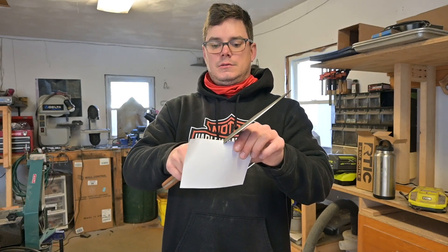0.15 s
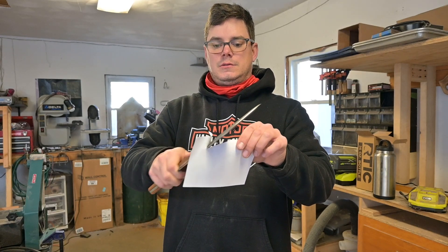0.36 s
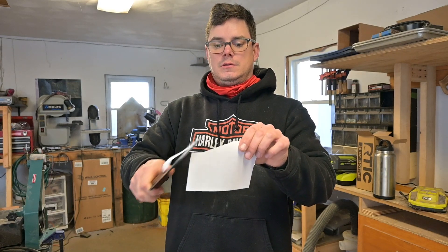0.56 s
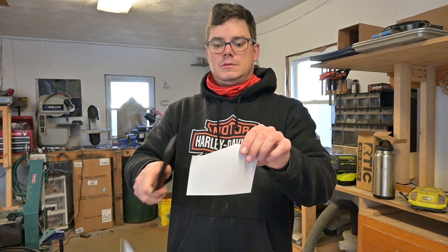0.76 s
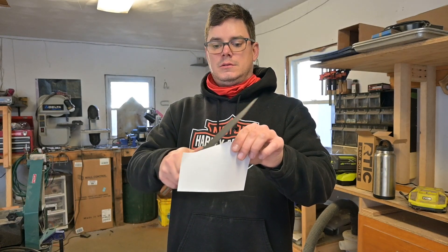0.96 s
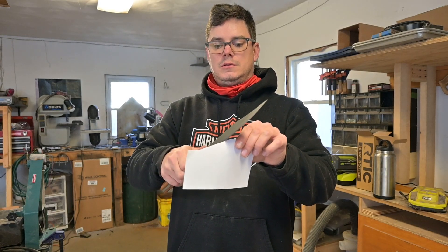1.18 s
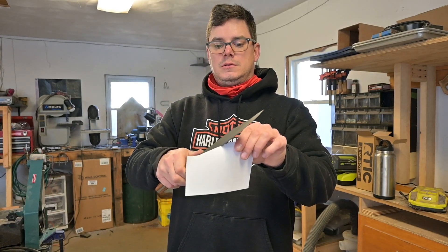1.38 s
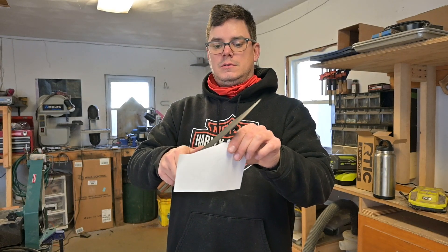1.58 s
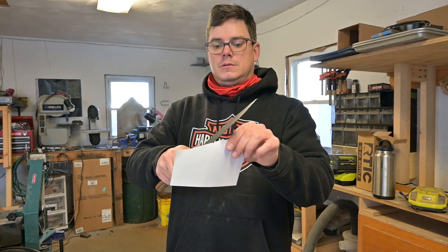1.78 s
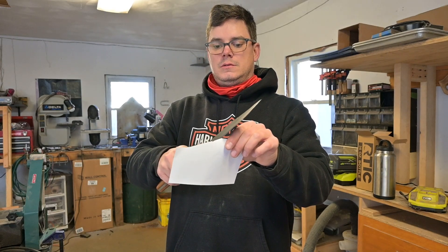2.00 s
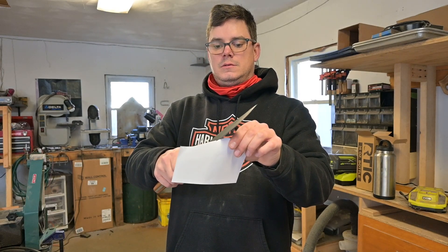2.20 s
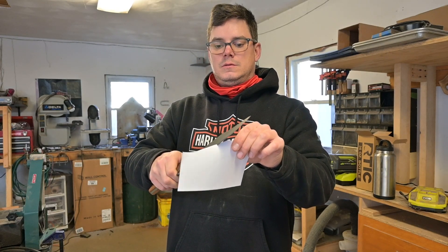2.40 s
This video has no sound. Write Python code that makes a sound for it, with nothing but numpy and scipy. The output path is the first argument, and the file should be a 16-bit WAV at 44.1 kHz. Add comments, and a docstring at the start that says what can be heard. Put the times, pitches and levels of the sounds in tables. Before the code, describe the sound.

A sharp knife cuts a hand-held sheet of paper. A soft hiss swells and brightens from 0 to 0.45 s, rips sharply out at 0.5 s, and the strip flicks free with a papery pop. Quiet follows until 1.1 s, then quick scratchy nibbles with ticks to 1.5 s, faint sliding, slower rasps at 2.05-2.3 s, and crackly kinks at 2.35-2.4 s. Short room reflections, low steady air noise, nearly mono.

```python
"""A sharp knife slices a hand-held sheet of paper in a small workshop. Snapping fibres (random pulses) hiss
and brighten as the blade speeds up, with sliding sheet resonances (swept band-passes). At about 0.5 s the blade
rips out through the edge (coloured pulses, rings) and the strip flicks free. From 0.7 s the knife nibbles in short
scratchy strokes (gated pulses) while the paper ticks (noise bursts), buckles (band noise) and kinks (damped sines);
from 1.6 s the resting blade slides faintly. Near echoes, a short room answer and steady air noise lie throughout."""
import sys
import numpy as np
from scipy import signal
from scipy.fft import rfft, irfft, next_fast_len
from scipy.io import wavfile
from scipy.ndimage import uniform_filter1d, map_coordinates

SR = 44100
rng = np.random.default_rng(int(sys.argv[2]) if len(sys.argv) > 2 else 0)


def transcribe(signal):
    """Save signal, clipped to [-1, 1], as a 16-bit WAV file at the path in sys.argv[1]."""
    frames = np.atleast_2d(signal).T
    limited = np.clip(frames, -1, 1)
    pcm = np.round(limited * 32767).astype(np.int16)
    wavfile.write(sys.argv[1], SR, pcm)


N = 108045
TIME_S = np.arange(N) / SR
FIBRES_PER_S, SLICE_SPREAD_DB, STROKE_SPREAD_DB = 9000, 3, 6


def amp(db):
    """Decibels to gain."""
    return 10 ** (np.asarray(db) / 20)


def unit(x):
    """Scale to rms 1."""
    return x / np.sqrt(np.mean(x ** 2) + 1e-20)


def along(points, hz):
    """(f/Hz, value) points interpolated on a log frequency axis."""
    f, v = np.transpose(points)
    return np.interp(np.log(hz + 1), np.log(f + 1), v)


def level(rows):
    """Gain per sample from rows of (t/s, .., level/dB); -120 dB outside, but a start before 0.05 s is held."""
    rows = np.array(rows)
    start_s, start_db = rows[0, 0], rows[0, -1]
    before_db = start_db if start_s < .05 else -120
    return amp(np.interp(TIME_S, rows[:, 0], rows[:, -1], left=before_db, right=-120))


def filtered(x, response):
    """Multiply the spectrum of x by response(f/Hz)."""
    size = next_fast_len(N + SR // 2)
    hz = np.fft.rfftfreq(size, 1 / SR)
    return irfft(rfft(x, size) * response(hz), size)[..., :N]


def impulse(colour, size=1024):
    """Minimum-phase impulse response of a colour, by folding the cepstrum."""
    hz = np.fft.rfftfreq(size, 1 / SR)
    cepstrum = irfft(np.log(amp(along(colour, hz))))
    cepstrum[1:size // 2] *= 2
    cepstrum[size // 2 + 1:] = 0
    return irfft(np.exp(rfft(cepstrum)))


def coloured(x, colour):
    """x through a causal colour."""
    return signal.fftconvolve(x, impulse(colour))[:N]


def fibres(spread_db, clump_db):
    """Dense tiny snaps of random size and sign that come in clumps, rms 1."""
    knots = TIME_S * 300  # 300 random clump levels per second
    clumps = map_coordinates(rng.standard_normal(int(knots[-1]) + 4), [knots])
    spread = np.clip(rng.standard_normal(N), -2, 2)
    sizes = amp(spread_db * spread + clump_db * clumps)
    snapped = rng.random(N) < FIBRES_PER_S / SR
    return unit(snapped * sizes * rng.choice([-1, 1], N))


def gritty(fine):
    """Fine fibres mixed with the sparser snaps of coarse ones; about rms 1."""
    coarse_per_s, coarse_share = 400, .26  # share of the power
    coarse = (rng.random(N) < coarse_per_s / SR) * rng.uniform(-1, 1, N)
    return np.sqrt(1 - coarse_share) * fine + np.sqrt(coarse_share) * unit(coarse)


def flexing(x):
    """The bending sheet favours ever new narrow bands for a few tens of milliseconds; rms 1."""
    flex_db = 2.6  # standard deviation of the band gains
    z = signal.stft(x, nperseg=512)[2]
    field = uniform_filter1d(rng.standard_normal(z.shape), size=3, axis=0)  # smooth in frequency
    field = uniform_filter1d(field, size=8, axis=1)  # smooth in time
    return unit(signal.istft(z * amp(flex_db * unit(field)), nperseg=512)[1][:N])


def resonate(x, hz, width_hz):
    """Slope of x through a steep resonance whose pitch may move, rms 1."""
    turn = np.exp(2j * np.pi * np.cumsum(hz * np.ones(N)) / SR)
    b, a = signal.butter(3, width_hz / SR)
    at_zero_hz = signal.lfilter(b, a, np.gradient(x) / turn)
    return unit((at_zero_hz * turn).real)


def glide(rows, width_hz):
    """Sliding resonance driven by a stream of fibres without clumps; rows of (t/s, f/Hz, level/dB)."""
    s, hz, _ = np.transpose(rows)
    stream = fibres(2, clump_db=0)
    return level(rows) * resonate(stream, np.interp(TIME_S, s, hz), width_hz)


def long_slice():
    """Snapping fibres: a swelling hiss that brightens with blade speed, plus four sliding sheet resonances."""
    # hiss: t/s, level/dB
    hiss_level = [(0, -45), (.11, -41.5), (.17, -34), (.21, -36.5), (.24, -33), (.29, -30), (.35, -27),
                  (.385, -30), (.42, -28.5), (.445, -32), (.47, -44), (.56, -63)]
    # hiss colour of the slow and the fast blade: f/Hz, gain/dB
    slow_colour = [(40, -54), (130, -30), (400, -23), (900, 1), (2700, 3.5), (3050, 0), (3500, 5),
                   (4100, 3.5), (4650, 4.5), (5400, -2), (7500, -2), (8500, -1), (9400, -3.5), (10000, -18),
                   (11500, -16.5), (12500, -0.5), (14000, -6.5), (16000, -11)]
    fast_colour = [(40, -49), (130, -32), (400, -16.5), (900, -14.5), (2000, 0), (3500, -1.5), (6000, -1),
                   (9200, 0), (10300, -10.5), (11400, -3.5), (12800, -7), (14300, -7), (16000, -11)]
    # sliding sheet resonances: t/s, f/Hz, level/dB
    low_glide = [(0, 1950, -53.5), (.05, 1900, -47.5), (.11, 1800, -43), (.15, 1750, -38),
                 (.18, 1500, -35.5), (.22, 1180, -40.5), (.25, 1060, -55)]
    mid_glide = [(.1, 13200, -61), (.2, 12700, -41.5), (.28, 12700, -32.5), (.33, 12600, -38),
                 (.375, 12500, -37), (.44, 12700, -47.5)]
    high_glide = [(.305, 16000, -48), (.333, 15200, -39), (.36, 13100, -32), (.385, 12100, -39),
                  (.398, 9400, -41), (.425, 9200, -36.5), (.44, 8400, -29), (.449, 7500, -51),
                  (.458, 6000, -38), (.48, 5700, -28.5)]
    # strongest ring, swelling as the cut nears the edge: t/s, f/Hz, level/dB
    ring_glide = [(.39, 2580, -48), (.465, 2420, -33), (.485, 2430, -28), (.515, 2380, -32),
                  (.535, 2330, -51)]

    speed = np.interp(TIME_S, [0.19, 0.313], [0, 1])  # 0 slow, 1 fast
    slow = flexing(coloured(gritty(fibres(SLICE_SPREAD_DB, clump_db=-0.2)), slow_colour))
    fast = flexing(coloured(fibres(SLICE_SPREAD_DB, clump_db=1.0), fast_colour))
    hiss = level(hiss_level) * (np.sqrt(1 - speed) * slow + np.sqrt(speed) * fast)
    low = glide(low_glide, width_hz=990)
    mid = glide(mid_glide, width_hz=1700)
    high = glide(high_glide, width_hz=1300)
    ring = glide(ring_glide, width_hz=470)
    return hiss + low + mid + high + ring


def rip():
    """The fast end of the cut sets the sheet ringing, then the cut strip flicks free as a sliding resonance."""
    # tear: t/s, level/dB
    tear_level = [(.41, -44.5), (.455, -24.5), (.48, -25), (.5, -21), (.512, -21), (.533, -19.5),
                  (.537, -28), (.541, -25), (.55, -36)]
    # tear colour: f/Hz, gain/dB
    tear_colour = [(50, -47), (150, -22.5), (280, -10), (900, -3.5), (1700, -3), (2800, 0.5), (5500, 3),
                   (8800, -0.5), (10500, -13), (13000, -4.5), (14500, -11.5), (16000, -20)]
    # sheet rings: f/Hz, width/Hz, level re tear/dB
    sheet_rings = [(4000, 360, -13), (5700, 320, -14)]
    # strip flicking free: t/s, f/Hz, level/dB
    flick_glide = [(.546, 2070, -35.5), (.552, 2500, -23), (.556, 2830, -25.5), (.562, 2880, -42)]

    tear = unit(coloured(fibres(SLICE_SPREAD_DB, clump_db=0.2), tear_colour))
    rings = np.zeros(N)
    for hz, width_hz, db in sheet_rings:
        rings += amp(db) * resonate(fibres(SLICE_SPREAD_DB, clump_db=-2.5), hz, width_hz)
    return level(tear_level) * (tear + rings) + glide(flick_glide, width_hz=1700)


def strokes():
    """Slow scratchy cuts: each rises, holds and stops; the sheet rasps and the fine edge adds fizz."""
    # strokes and brushes: start/s, end/s, scratch level/dB, rise/s, fizz level/dB
    cuts = [(.679, 0.695, -69, .004, -51), (1.127, 1.173, -49, 0.0147, -66),
            (1.174, 1.227, -41, 0.024, -54), (1.233, 1.292, -48, 0.012, -55.5),
            (1.276, 1.328, -41.5, 0.037, -44), (1.343, 1.379, -45.5, 0.012, -52),
            (1.398, 1.436, -45, 0.013, -43), (1.439, 1.494, -43.5, 0.024, -50.5),
            (1.55, 1.569, -67, .005, -54.5), (1.622, 1.661, -59, 0.025, -56),
            (1.699, 1.704, -49.5, 0.0018, -73), (1.721, 1.781, -62, .01, -75),
            (2.02, 2.103, -68, 0.021, -64.5), (2.066, 2.206, -41.5, 0.095, -56),
            (2.204, 2.297, -41, 0.037, -50), (2.339, 2.351, -39.5, 0.0027, -57),
            (2.4, 2.421, -49.5, 0.0045, -67)]
    # scratch and fizz colours: f/Hz, gain/dB
    scratch_colour = [(40, -34), (120, -19.5), (350, -10), (900, 3), (2200, 5), (3000, -3), (6000, -2),
                      (9200, 0.5), (10100, -15), (11500, -15), (13300, -10), (16000, -27)]
    fizz_colour = [(500, -23), (3000, -2), (7000, 0.5), (9000, 0), (10300, -7), (12500, 0), (13600, -2.5),
                   (16000, -9)]
    # sheet resonances: f/Hz, width/Hz, level re scratch/dB
    sheet_rasp = [(924, 216, -13), (2080, 180, -13.5), (3800, 540, -13)]
    release_s = .012

    push, edge = np.zeros(N), np.zeros(N)
    for start_s, end_s, db, rise_s, fizz_db in cuts:
        rise = np.clip((TIME_S - start_s) / rise_s, 0, 1)
        shape = rise * np.exp(-np.maximum(TIME_S - end_s, 0) / release_s)
        push += amp(db) * shape
        edge += amp(fizz_db) * shape
    scratch = flexing(coloured(gritty(fibres(STROKE_SPREAD_DB, clump_db=2.0)), scratch_colour))
    rasp = np.zeros(N)
    for hz, width_hz, db in sheet_rasp:
        rasp += amp(db) * resonate(fibres(STROKE_SPREAD_DB, clump_db=1), hz, width_hz)
    fizz = unit(coloured(fibres(STROKE_SPREAD_DB, clump_db=5.5), fizz_colour))
    return push * (scratch + rasp) + edge * fizz


def snaps():
    """Single fibres catch and snap: sharp ticks, each trailed by a brief noise crackle."""
    # snaps: t/s, level before colour/dB
    ticks = [(0.4976, -12), (0.5398, -20.5), (1.157, -35), (1.2625, -27.5), (1.306, -25.5), (1.315, -25.5),
             (1.337, -28), (1.3693, -21.5), (1.438, -24.5), (1.465, -24), (1.4856, -21.5), (1.6998, -27.5),
             (2.046, -42), (2.1335, -37), (2.1854, -32), (2.26, -43), (2.285, -38), (2.342, -27),
             (2.3572, -23.5), (2.361, -33.5), (2.372, -26.5), (2.4035, -26.5)]
    # tick colour: f/Hz, gain/dB
    tick_colour = [(200, -6), (1200, 3.5), (2500, 9), (9000, 3.5), (10500, -1), (13000, 9.5), (16000, -16)]

    out, t = np.zeros(N + SR), np.arange(SR // 20) / SR
    for s, db in ticks:
        tick = 0.2 * rng.standard_normal(len(t)) * np.exp(-t / 0.0012)
        tick[0] = 1
        out[round(s * SR):][:len(t)] += amp(db) * tick
    return coloured(out[:N], tick_colour)


def buckles():
    """Dull band-noise pops of the flexing sheet with a soft sine thump below and a little crispness on top."""
    # pops: t/s, level/dB, decay/s, upper edge/Hz
    pops = [(0.5429, -28, 0.0032, 2500), (0.5504, -25, 0.0061, 2880), (.574, -35, 0.013, 2680),
            (.624, -40.5, 0.011, 1670), (1.215, -41.5, 0.011, 1800), (1.519, -41.5, 0.011, 1750),
            (1.527, -37, 0.011, 1750), (2.319, -40.5, 0.0047, 2420), (2.3406, -38.5, 0.0025, 3500),
            (2.3493, -32, 0.0026, 2540), (2.3595, -34.5, 0.0035, 3000), (2.3705, -38, .003, 3000),
            (2.3983, -30.5, 0.0077, 1900), (2.4082, -31, 0.005, 2200), (2.417, -32, 0.0021, 1380)]
    low_hz, body_hz = 724, 301
    crisp_db, body_db = -20, -23  # re pop level

    out, t = np.zeros(N + SR), np.arange(SR // 10) / SR
    crisp_sos = signal.butter(2, low_hz, 'high', fs=SR, output='sos')
    for s, db, decay_s, edge_hz in pops:
        noise = rng.standard_normal(len(t))
        high_hz = np.clip(edge_hz, low_hz + 100, SR / 2 - 100)
        band_sos = signal.butter(2, [low_hz, high_hz], 'band', fs=SR, output='sos')
        push = amp(db) * np.exp(-t / decay_s) * noise
        pop = signal.sosfilt(band_sos, push) / signal.sosfilt(band_sos, noise).std()
        crisp = amp(crisp_db) * signal.sosfilt(crisp_sos, push)
        swell = t / decay_s * np.exp(1 - t / decay_s)  # peaks at 1 after decay_s
        thump = amp(db + body_db) * swell * np.sin(2 * np.pi * body_hz * t)
        out[round(s * SR):][:len(t)] += pop + crisp + thump
    return out[:N]


def kinks():
    """The sheet snaps through: one strongly damped swing per kink, high-passed to remove its offset."""
    # clicks: t/s, level before damping and high-pass/dB, f/Hz
    clicks = [(0.5737, -33, 1700), (1.6998, -28.5, 1740), (2.3501, -21, 1190), (2.3572, -22, 1710),
              (2.3668, -31, 1700), (2.4034, -19.5, 1150), (2.4089, -23, 1390)]
    decay_cycles, low_hz = 0.63, 520  # the high-pass also keeps the click light

    out, t = np.zeros(N + SR), np.arange(SR // 50) / SR
    for s, db, hz in clicks:
        swing = np.sin(2 * np.pi * hz * t) * np.exp(-t * hz / decay_cycles)
        out[round(s * SR):][:len(t)] += amp(db) * swing
    return signal.sosfilt(signal.butter(2, low_hz, 'high', fs=SR, output='sos'), out[:N])


def blade_slide():
    """The resting blade slides faintly along the paper's edge: a wide sliding resonance of fibres."""
    # slide: t/s, f/Hz, level/dB
    slide_glide = [(1.6, 6860, -73), (1.655, 6770, -63), (1.72, 7200, -73), (1.8, 7950, -70),
                   (1.87, 8060, -72), (1.93, 8300, -88)]
    return glide(slide_glide, width_hz=4400)


def near_echoes(x):
    """Single delayed reflections, as phase turns in the spectrum."""
    # body, shelf and floor: delay/s, level/dB
    surfaces = [(.0023, -26), (.0052, -24.5), (.0087, -15)]

    def reflections(hz):
        return sum(amp(db) * np.exp(-2j * np.pi * hz * delay_s) for delay_s, db in surfaces)
    return filtered(x, reflections)


def workshop(x):
    """The cluttered room's short answer: x convolved with decaying noise of unit energy."""
    # reverberation time: f/Hz, T60/s
    room_t60 = [(200, 0.28), (1400, 0.32), (4000, 0.36), (10000, .34), (16000, 0.3)]
    wall_delay_s = 0.0024

    hz, t, z = signal.stft(rng.standard_normal(SR // 2), SR, nperseg=256)
    decay = amp(-60 * t / along(room_t60, hz)[:, None])
    tail = signal.istft(z * decay, SR, nperseg=256)[1]
    tail *= np.clip(np.arange(len(tail)) / SR / wall_delay_s - 1, 0, 1)
    return signal.fftconvolve(x, tail / np.linalg.norm(tail))[:N]


def room_air():
    """Steady air noise: white noise shaped in the spectrum."""
    # noise colour: f/Hz, gain/dB
    air_colour = [(20, -51), (50, -22), (75, -21.5), (115, -15), (150, -19), (190, -17.5), (240, -6.5),
                  (290, -14.5), (370, -8), (640, -8.5), (850, -1.5), (1200, -8), (2000, -14), (3200, -22.5),
                  (6000, -29.5), (11000, -33.5), (15500, -33)]
    air_db = -54  # rms
    return amp(air_db) * unit(filtered(rng.standard_normal(N), lambda hz: amp(along(air_colour, hz))))


def spread(mid):
    """Nearly mono stereo: a room-smeared side signal and a phase offset between left and right."""
    # stereo width: f/Hz, side over mid/dB
    side_width = [(100, -19), (1000, -56), (3000, -80), (5000, -57), (8000, -24), (13000, -17.5)]
    # phase lead of left over right: f/Hz, phase/rad
    left_lead = [(3500, 0), (6000, -.04), (8500, -.19), (10300, -.08), (13000, -.4), (16000, -.22)]

    side = filtered(workshop(mid), lambda hz: amp(along(side_width, hz)))
    pair = np.array([mid + side, mid - side])
    return filtered(pair, lambda hz: np.exp(np.outer([.5j, -.5j], along(left_lead, hz))))


def scene():
    """Paper, near echoes, room and steady air noise; nearly mono, with a slight spread in the treble."""
    room_db = -10
    paper = long_slice() + rip() + strokes() + snaps() + buckles() + kinks() + blade_slide()
    mid = paper + near_echoes(paper) + amp(room_db) * workshop(paper) + room_air()
    return spread(mid)


def record(dry):
    """Brick-wall low-pass: nothing remains above the band limit."""
    top_hz = 15950
    return filtered(dry, lambda hz: hz < top_hz)


dry = scene()
out = record(dry)
transcribe(out)
```